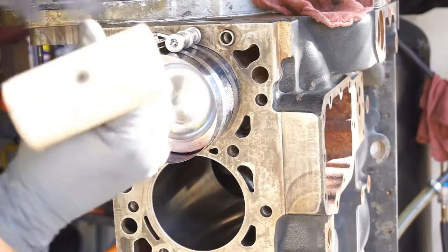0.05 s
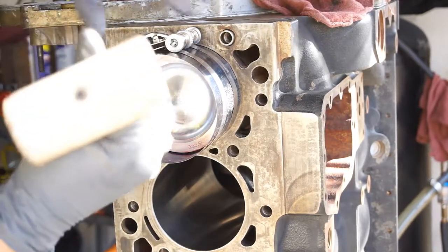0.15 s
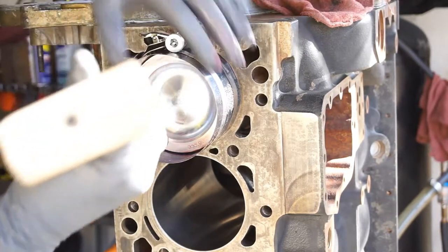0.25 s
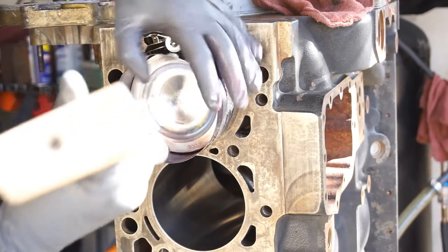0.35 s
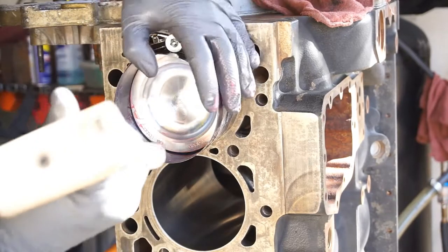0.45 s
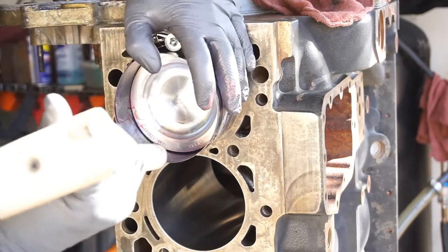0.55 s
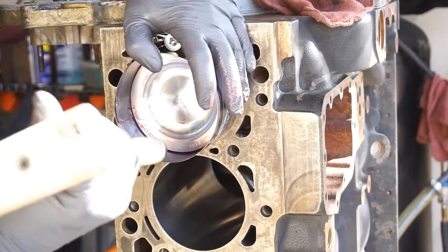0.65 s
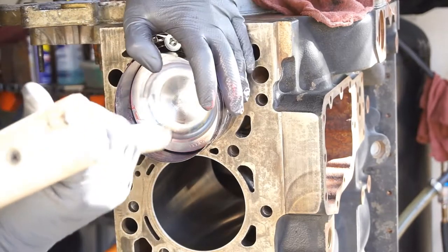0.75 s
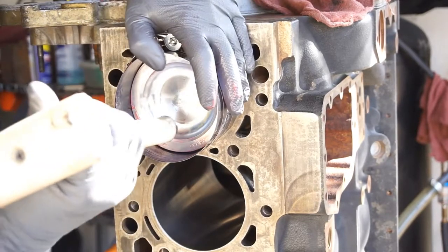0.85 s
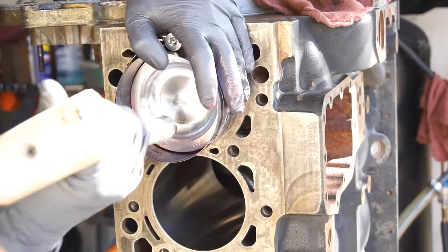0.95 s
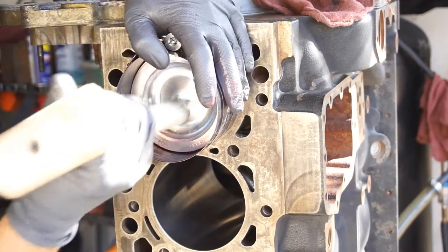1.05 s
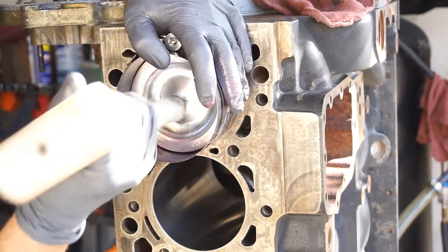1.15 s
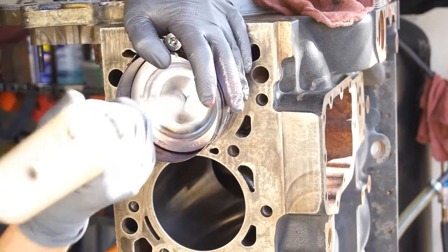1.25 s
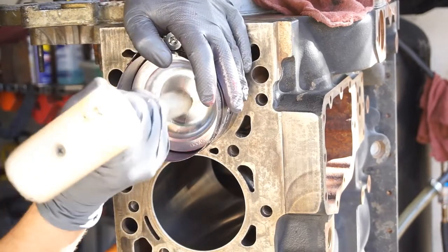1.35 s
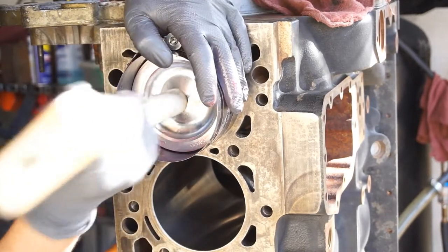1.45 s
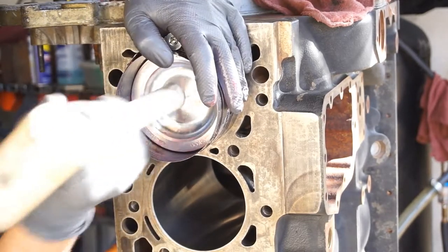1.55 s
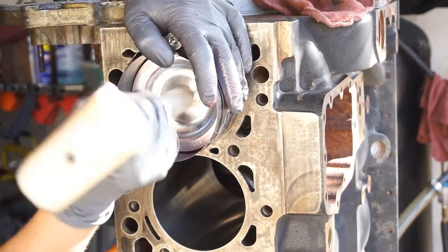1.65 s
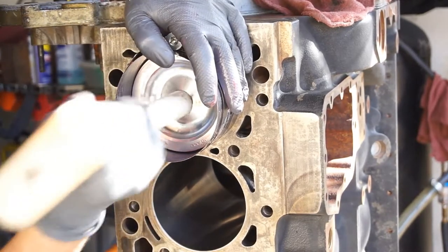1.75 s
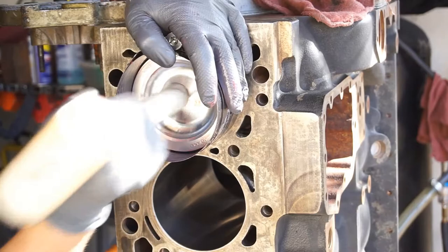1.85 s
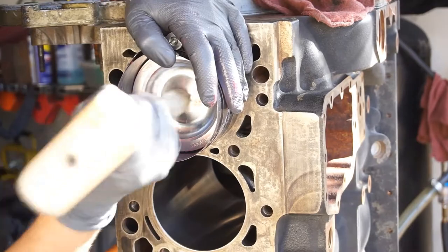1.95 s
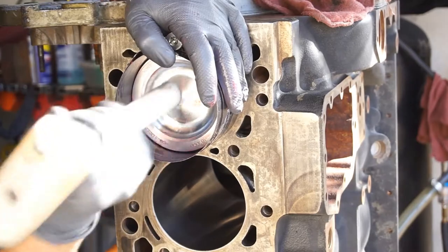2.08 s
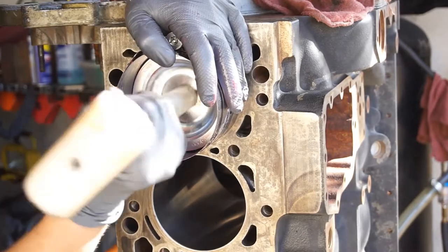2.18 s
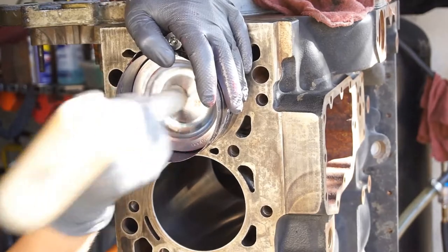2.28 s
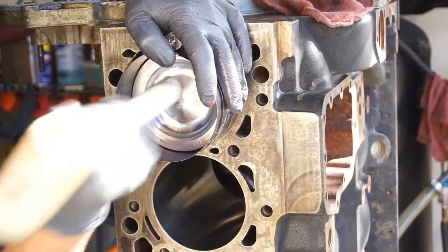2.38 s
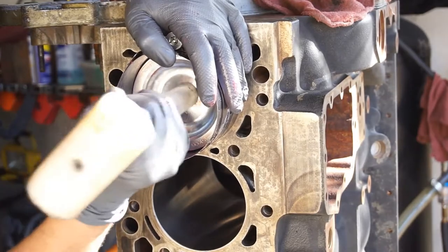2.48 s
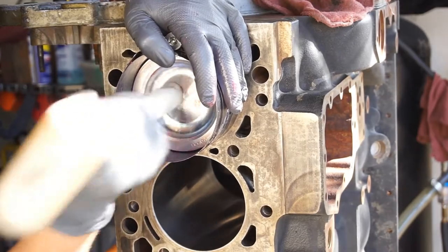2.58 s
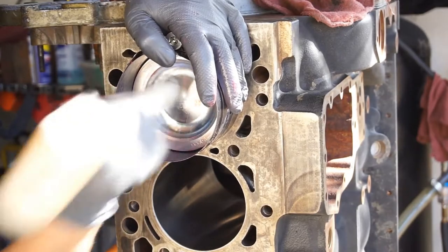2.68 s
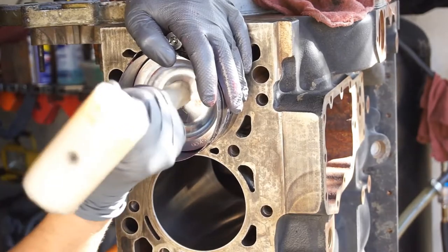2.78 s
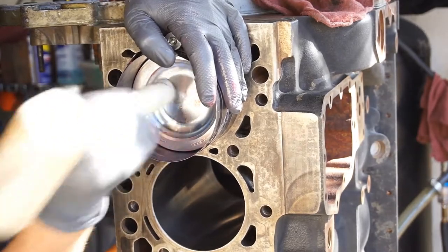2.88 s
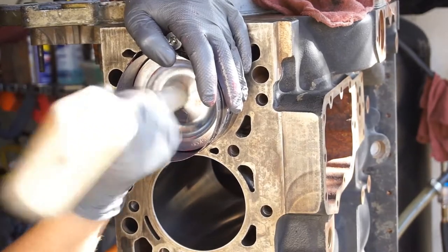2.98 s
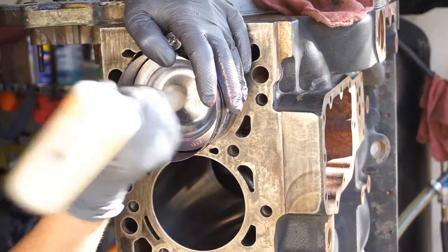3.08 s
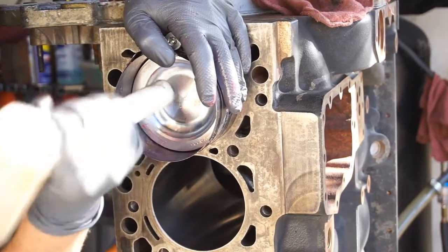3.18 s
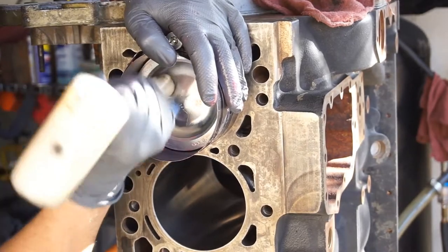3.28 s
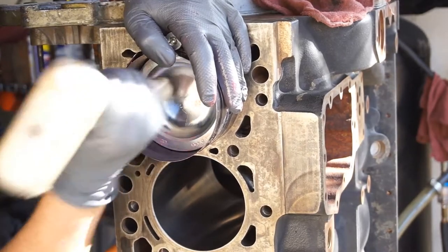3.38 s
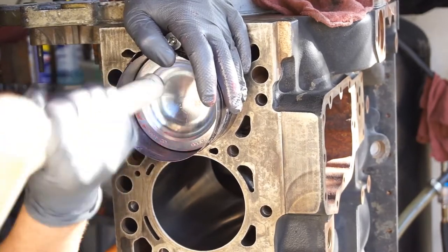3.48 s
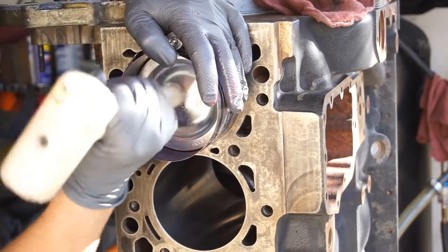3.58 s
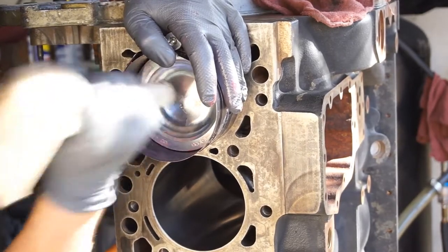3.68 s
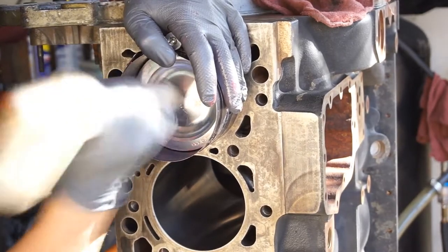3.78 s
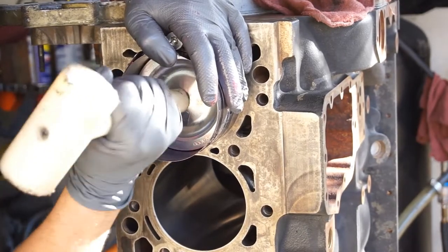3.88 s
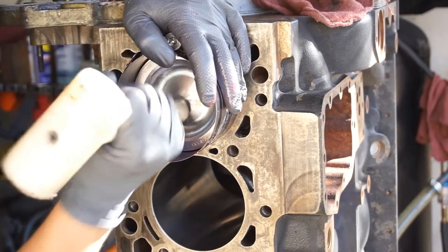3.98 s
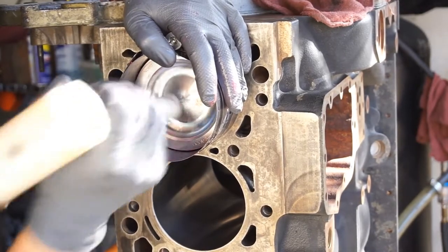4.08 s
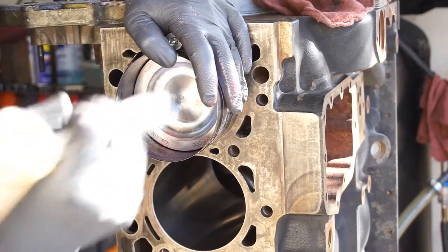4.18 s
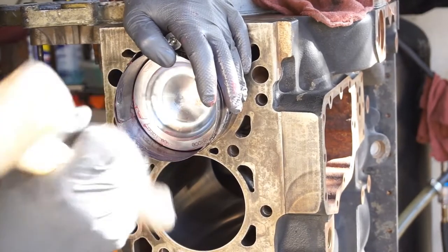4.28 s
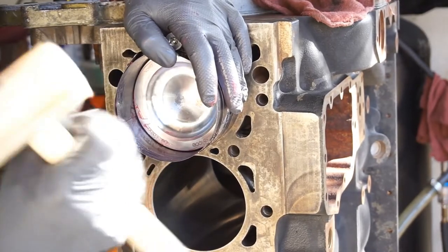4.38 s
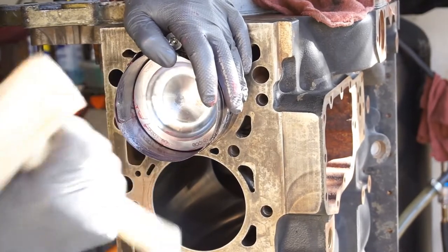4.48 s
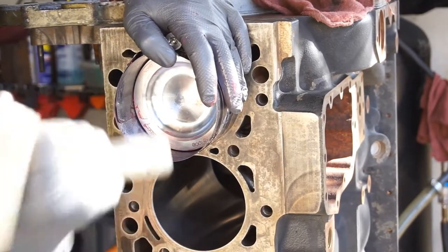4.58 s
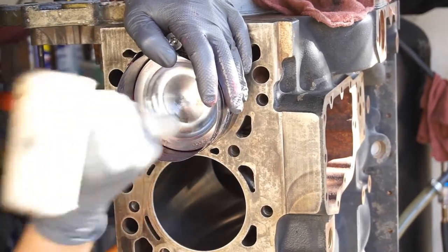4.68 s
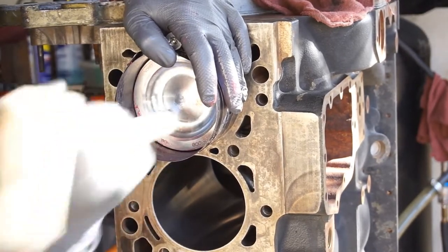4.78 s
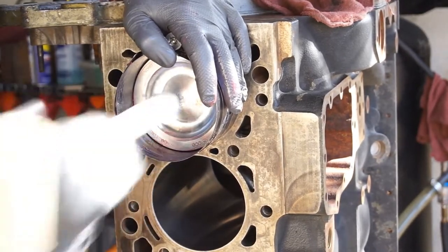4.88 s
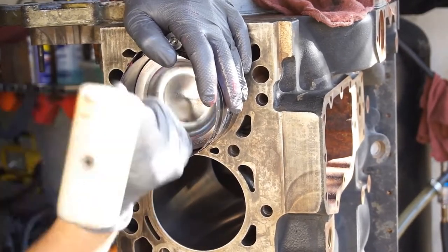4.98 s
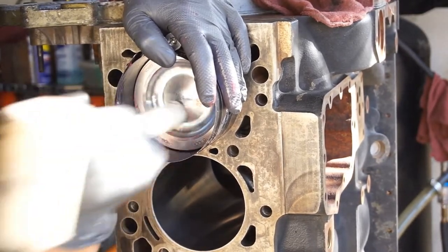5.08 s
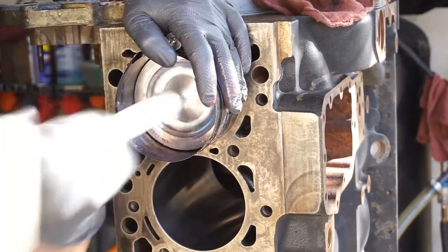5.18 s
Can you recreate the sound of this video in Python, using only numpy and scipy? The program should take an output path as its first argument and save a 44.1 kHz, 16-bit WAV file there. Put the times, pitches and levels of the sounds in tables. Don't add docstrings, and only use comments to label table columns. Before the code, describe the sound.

A wooden handle end knocks a metal piston into its cylinder in quick, even, hard taps ringing through a hard-walled workshop.

```python
import sys
import numpy as np
from scipy import signal
from scipy.fft import rfft, irfft, next_fast_len
from scipy.io import wavfile
from scipy.ndimage import uniform_filter1d, map_coordinates

SR = 44100
rng = np.random.default_rng(int(sys.argv[2]) if len(sys.argv) > 2 else 0)


def ratio_of_db(decibels):
    return 10 ** (np.asarray(decibels, float) / 20)


def put_to_file(sound):
    columns = np.atleast_2d(sound).T
    safe = np.clip(columns, -1, 1)
    whole_steps = np.round(safe * 32767)
    wavfile.write(sys.argv[1], SR, whole_steps.astype(np.int16))


N = 231348


def unit(x):
    return x / np.sqrt(np.mean(x ** 2) + 1e-20)


def along(points, hz):
    f, v = np.transpose(points)
    return np.interp(np.log(hz + 1), np.log(f + 1), v)


def curves(rows, rest):
    s, *cols = np.transpose(rows)
    return [np.interp(np.arange(N) / SR, s, c, rest, rest) for c in cols]


def filtered(x, response):
    m = next_fast_len(x.shape[-1] + 8192)
    return irfft(rfft(x, m) * response(np.fft.rfftfreq(m, 1 / SR)), m)[..., :x.shape[-1]]


def paired(pair, spectrum, alike):
    def mid_side_gains(hz):
        turn = np.arccos(np.clip(along(alike, hz), -1, 1)) / 2
        return ratio_of_db(along(spectrum, hz)) * [np.cos(turn), np.sin(turn)]

    mid, side = filtered(pair, mid_side_gains)
    return np.array([mid + side, mid - side])


def lumpy(spectrum, rate, lump_db):
    # (frequency [Hz], likeness [-1..1])
    loose = [(60, 0.37), (220, 0.55), (840, 0.2), (3150, 0.079), (11800, -0.13)]
    steps = rng.standard_normal(int(N * rate / SR) + 4)
    stutter = map_coordinates(steps, [np.arange(N) * rate / SR])
    noise = paired(rng.standard_normal((2, N)), spectrum, loose)
    return unit(ratio_of_db(lump_db * stutter) * noise)


def swell(s, hold_s, db, rise_s, fall_s):
    t = np.arange(N) / SR - s
    return ratio_of_db(db + 60 * np.minimum(0, np.minimum(t / rise_s, (hold_s - t) / fall_s)))


def add(out, s, x):
    part = out[:, round(s * SR):][:, :x.shape[-1]]
    part += x[..., :part.shape[1]]


def room_air():
    # (frequency [Hz], density [dB per Hz])
    air_spectrum = [(15, -74), (25, -32), (221, -14.5), (265, -13.5), (466, -8), (739, -5.5), (1140, -8.5),
                    (1860, -11), (2340, -16), (10600, -19.5), (11500, -2.5), (15000, -52), (22000, -120)]
    air_db = -59
    return ratio_of_db(air_db - 3.0) * lumpy(air_spectrum, 8, lump_db=.4)


def steel_band():
    # (start [s], hold [s], level [dB])
    singing = [
        (4.29, 0.56, -74),
        (4.41, 0.092, -72),
        (4.57, 0.046, -68),
        (4.709, .03, -63),
        (4.787, 0.036, -81),
        (4.85, 0.069, -60),
        (5.034, 0.053, -55),
        (5.143, 0.042, -61),
    ]
    # (time [s], pitch [Hz], level [dB])
    squeak_path = [
        (1.08, 7600, -74),
        (1.11, 8700, -73),
        (1.135, 9800, -70),
        (1.15, 10300, -73),
    ]
    drift = np.cumsum(rng.standard_normal(N)) * 0.0322
    level = sum(swell(*row, rise_s=0.066, fall_s=0.062) for row in singing)
    hum = level * np.sin(2 * np.pi * 2040 * np.arange(N) / SR + drift)
    squeak_hz, squeak_db = curves(squeak_path, rest=-99)
    squeak = ratio_of_db(squeak_db) * np.sin(2 * np.pi * np.cumsum(squeak_hz) / SR + 6 * drift)
    return (hum + squeak) * ratio_of_db([[1.1], [-1.1]])


def glove_ticks():
    # (time [s], peak [dB], pitch [Hz], t60 [s], left over right [dB])
    tick_rows = [(0.228, -48, 710, 0.047, 1.5), (0.315, -48, 1570, 0.036, 9), (.459, -35, 1800, 0.14, 4),
                 (.46, -33.5, 4300, 0.063, -2), (0.785, -36.5, 9000, 0.0079, 10),
                 (1.035, -40.5, 9500, 0.0054, 14), (1.137, -43.5, 5050, 0.061, 6),
                 (4.067, -60, 4500, 0.01, 5), (4.102, -56, 3660, 0.027, 7), (4.3, -42.5, 8800, 0.051, 14),
                 (4.334, -42.5, 4180, 0.021, 10), (4.336, -35.5, 9200, 0.022, 14),
                 (4.389, -61, 6000, 0.018, 4.5), (4.4582, -28.5, 4030, 0.004, 13),
                 (4.4597, -39, 2560, 0.011, -12), (4.735, -55, 9000, 0.0092, 13)]
    out, t = np.zeros((2, N)), np.arange(SR // 8) / SR
    for s, db, hz, t60, pan_db in tick_rows:
        decay = ratio_of_db(-60 * t / t60) + ratio_of_db(-35 - 60 * t / 0.26)
        rise = 1 - np.exp(-t / (.12 * t60))
        burst = rng.standard_normal(len(t)) * decay * rise
        burst = filtered(burst, lambda f: 1j * f * hz * 1.3 / (hz * hz - f * f + 1j * f * hz * 0.5))
        add(out, s, ratio_of_db(db - 0.1) * burst / np.abs(burst).max() * ratio_of_db([[pan_db / 2], [-pan_db / 2]]))
    return out


def hands():
    # (start [s], hold [s], shuffle [dB], rustle over shuffle [dB], rustle left over right [dB])
    moves = [(0, 0.12, -51.5, -5, 5.5), (0.158, 0.19, -54.5, -6, 3), (0.34, 0.046, -62, 2, 0.6),
             (0.407, 0.058, -50, 2, -.6), (0.508, 0.18, -60, -4, 1.1), (0.781, .006, -61, 1.5, -1),
             (0.836, 0.37, -61.5, -6, 1.1), (1.027, .03, -58.5, -11, 1.1), (1.14, 0.011, -60.5, 3.5, 6),
             (1.2, .07, -55.5, -9, 4), (3.938, 0.047, -60, -1.5, 5), (4.07, 0.04, -72.5, 0.5, 12),
             (4.322, 0.028, -81.5, 29.5, 5), (4.385, .008, -93, 16, 5), (4.423, 0.018, -84, 26, 10),
             (4.457, 0.014, -75, 14.5, -2), (4.504, 0.046, -70, -1, 6), (4.599, 0.018, -61.5, -0.5, 9),
             (4.67, 0.29, -67, -25, 3)]
    # (frequency [Hz], density [dB per Hz])
    shuffle_spectrum = [(59, -55), (100, -27), (188, -22.5), (269, -6.5), (618, -2.5), (1660, -4.5),
                        (1850, -4.5), (4000, -18), (5200, -32), (8800, -120)]
    # (frequency [Hz], density [dB per Hz])
    rustle_spectrum = [(1180, -64), (2000, -6.5), (3100, -4.5), (4070, -2), (6590, -5), (10600, -1.5),
                       (11300, 4.5), (11500, -17), (15000, -56), (22000, -120)]
    # (time [s], level [dB])
    slide_level = [
        (.84, -77),
        (.9, -58.5),
        (.97, -56.5),
        (1.05, -60.5),
        (1.12, -67),
        (1.2, -84),
    ]
    power = 0
    for s, hold_s, db, over_db, pan_db in moves:
        split = ratio_of_db([[0], [2 * over_db + pan_db], [2 * over_db - pan_db]])
        power = power + swell(s, hold_s, db, rise_s=0.2, fall_s=0.31) ** 2 * split
    shuffle = ratio_of_db(-1.5) * np.sqrt(power[0]) * lumpy(shuffle_spectrum, 40, lump_db=2.0)
    rustle = ratio_of_db(1.55) * np.sqrt(power[1:]) * lumpy(rustle_spectrum, 200, lump_db=1.5)
    slide_spectrum = [(900, -63.5), (1200, -4), (1440, 9), (1650, -20), (2200, -59)]
    slide = ratio_of_db(curves(slide_level, rest=-99)[0]) * lumpy(slide_spectrum, 90, lump_db=1.5)
    return shuffle + rustle + slide


def wash(lasting, floor_ms, bright_db, ring_hz, ring_db, skirt_hz, skirt_db, top_hz):
    # (frequency [Hz], density [dB per Hz])
    tail_spectrum = [(71, -64), (120, -23), (252, 10), (382, -0.5), (508, 6), (602, 6), (816, 3), (1150, 4),
                     (1480, 3.5), (1720, -3.5), (2150, 6.5), (3100, -3), (4860, -5), (11200, -20.5),
                     (14600, -77), (22000, -120)]
    # (frequency [Hz], t60 [s])
    room_decay = [(200, 0.72), (600, 0.5), (2000, 0.43), (5000, 0.35), (10000, 0.35)]
    # (frequency [Hz], share [0..1])
    same_share = [(300, .9), (700, .7), (1000, .5), (2000, .35), (8000, .25)]
    # (frequency [Hz], left-right likeness [-1..1])
    tail_likeness = [(60, 0.27), (170, 1), (500, 0.9), (1430, 0.51), (4100, 0.16), (11800, -0.79)]
    modal_hz, build_s = 420., .004

    hz, t, z = signal.stft(np.array([lasting, rng.standard_normal(lasting.shape)]), SR, nperseg=256)
    same = np.clip(along(same_share, hz), 0, 1)[:, None]
    patches = uniform_filter1d(rng.standard_normal(z.shape[2:]), size=3, axis=0)
    patches = unit(uniform_filter1d(patches, size=4, axis=1))
    mixed = np.sqrt(same) * z[0] + np.sqrt(1 - same) * z[1]
    mixed = mixed * ratio_of_db(1.2 * patches - 60 * t / along(room_decay, hz)[:, None])
    tail = unit(paired(signal.istft(mixed, SR, nperseg=256)[1], tail_spectrum, tail_likeness))

    def hump(f, centre_hz, width_hz):
        return np.exp(-((f - centre_hz) / width_hz) ** 2)

    def colour(f):
        landing_db = ring_db * hump(f, ring_hz, 84) + (skirt_db + 0.5) * hump(f, skirt_hz, 870)
        landing_db = landing_db + bright_db * along([(2500, 0.092), (7000, 0.33)], f)
        floor = 1 + 0.31 * np.exp(-2j * np.pi * f * floor_ms / 1000)
        return ratio_of_db(landing_db) * floor * (.33 + .67 * f ** 4 / (f ** 4 + modal_hz ** 4))

    tail = filtered(tail, colour)
    return tail * (1 - np.exp(-np.arange(tail.shape[1]) / SR / build_s)) * ratio_of_db([[.9], [-.9]])


def knock(lead, crown_hz, crack_db, ring_hz, ring_db, skirt_hz, skirt_db, top_hz):
    # (frequency [Hz], level [dB], t60 [s])
    piston = [(650, -5, .016), (950, -5, .014), (1380, -11, .016), (2480, -12, .012), (3300, -13, .01)]
    quick_s, crack_s = .006, .009
    grip_s, bloom_s, deck_ms = .0025, .0005, 1.5
    t = np.arange(SR // 16) / SR
    modes = piston + [(crown_hz, -7, .02), (skirt_hz, -11, quick_s), (top_hz, -17, quick_s)]
    ring = 0
    for hz, db, t60 in modes:
        ring = ring + ratio_of_db(db + rng.normal(0, 1) - 60 * t / t60) * np.cos(2 * np.pi * hz * t)
    choke = .12 + .88 / (1 + np.exp(8 * (t / grip_s - 1)))
    ring = ring * choke * (1 - .4 * np.exp(-t / bloom_s))
    ring = ring + ratio_of_db(ring_db - 13.0 - 60 * t / 0.013) * np.cos(2 * np.pi * ring_hz * t)
    crack = rng.standard_normal(len(t)) * ratio_of_db(crack_db + 11.5 - 60 * t / crack_s)
    crack = uniform_filter1d(crack, size=2)
    crack = crack + ratio_of_db(-1) * np.roll(crack, round(deck_ms * SR / 1000))
    rise = np.r_[-.45 * np.hanning(11), np.hanning(15)]
    whole = np.convolve(ring, rise / rise.sum())[:len(t)] + np.roll(crack, 12)
    whole = np.pad(whole, (lead, 0))
    whole = filtered(whole, lambda hz: hz ** 6 / (hz ** 6 + 244.0 ** 6))
    return whole / whole.max()


def taps():
    # (time [s], peak [dB], ring [Hz], ring level [dB], room boom over the peak [dB])
    blows = [(1.2615, -13.5, 2165, 9.5, -3), (1.5552, -11, 2040, 6, 0.4), (1.8182, -10.5, 2150, 5.5, 0.3),
             (2.0874, -8.7, 2080, 6.5, 0), (2.3655, -6.5, 2330, 5.5, -3.5), (2.6444, -6.5, 2114, 3.5, -2.5),
             (2.9244, -8, 2170, 7, -2.5), (3.1932, -7.5, 1990, 4.5, 1.6), (3.493, -10.5, 1950, 9, 0.3),
             (3.7327, -8.5, 2030, 7.5, -0.4), (4.8761, -10.5, 2050, 5.5, 4.5), (5.1798, -9.5, 1870, 3, 3)]
    # (from [s], crown mode [Hz], skirt mode [Hz], skirt level [dB], floor echo [dB])
    spots = [
        (1.2, 2350, 5160, -3, 2),
        (2.2, 2340, 5030, 4, -3.4),
        (3.4, 2360, 3580, 6, -10.5),
        (4.8, 1860, 4200, 3, -2.5),
    ]
    # (delay [ms], level [dB])
    walls = [(11.5, -17), (18, -12), (26, -18), (33.5, -13), (37, -14), (45, -17), (56, -18)]
    # (frequency [Hz], level [dB], t60 [s])
    standing = [(237, -11, .7), (253, -2, 1.1), (267, -3, .9), (298, -8, .8), (328, -11, .7), (369, -7, .7),
                (444, -9, .7), (471, -9, .8), (544, -9, .6), (581, -7, .6), (598, -11, .6), (616, -9, .6),
                (705, -11, .6), (751, -11, .6), (786, -12, .6), (864, -13, .6), (893, -12, .6),
                (939, -14, .5), (1020, -13, .5), (1050, -14, .5), (1133, -14, .5), (1163, -13, .5),
                (1305, -15, .5), (1367, -14, .5), (1478, -13, .5)]
    usual_db, crack_lag = -7, 0.6
    usual_crack_db, bright_ref_db = -20, -19
    lead = 400

    out, t = np.zeros((2, N)), np.arange(SR * 3 // 4) / SR
    lasting = rng.standard_normal((2, len(t)))
    start = rng.uniform(0, 2 * np.pi, len(standing))
    lean = rng.normal(0, 0.9, (len(walls), 1)) * [1, -1]
    tilt = rng.normal(0.26, 0.93, (len(standing), 1, 1)) * [[1], [-1]]
    hold = ratio_of_db(-15 / (1 + np.exp((.17 - t) / .01))) * (1 - np.exp(-t / .012))
    first = np.diff([0] + [row[0] for row in blows]) > .6
    for (s, db, ring_hz, ring_db, boom_db), after_pause in zip(blows, first):
        _, crown_hz, skirt_hz, skirt_db, floor_db = [spot for spot in spots if spot[0] < s][-1]
        scatter = 1 + .03 * rng.standard_normal(size=3)
        crown_hz, skirt_hz, top_hz = [crown_hz, skirt_hz, 7350] * scatter
        floor_ms = 6.7 + 1.4 * after_pause
        crack_db = usual_crack_db - crack_lag * (db - usual_db)
        tone = ring_hz, ring_db, skirt_hz, skirt_db, top_hz

        blow = ratio_of_db(db + 1.0) * knock(lead, crown_hz, crack_db, *tone)
        late = round(floor_ms * SR / 1000)
        both = blow + ratio_of_db(floor_db) * np.pad(blow, (late, 0))[:len(blow)]
        early = s - (lead + 17) / SR
        add(out, early, both * ratio_of_db([[1.2], [-1.2]]))

        dull = uniform_filter1d(blow, size=4)
        for (ms, wall_db), side_db in zip(walls, lean):
            add(out, early + ms / 1000, dull * ratio_of_db(wall_db + side_db[:, None] + rng.normal(0, 1.2)))

        boom = 0
        for (hz, level, t60), phase, side_db in zip(standing, start, tilt):
            gain = ratio_of_db(level + side_db + rng.normal(0, 3.2) - 60 * t / t60)
            boom = boom + gain * np.sin(2 * np.pi * hz * t + phase + rng.normal(0, 0.64))
        add(out, s, ratio_of_db(db + boom_db - 33) * unit(boom) * hold)

        tail = wash(lasting, floor_ms, crack_db - bright_ref_db, *tone)
        add(out, s, ratio_of_db(db + 2.38 - 31) * tail)

        rumble = rng.standard_normal((2, len(t))) + 2 * rng.standard_normal(len(t))
        thump = filtered(rumble, lambda hz: hz ** 2 / (40 + 1j * hz) ** 2 / (130 + 1j * hz) ** 2)
        add(out, s, ratio_of_db(db - 65 + 6.0) * unit(thump) * ratio_of_db(-60 * t / 0.68))
    return out


def scene():
    return room_air() + steel_band() + glove_ticks() + hands() + taps()


def roll_off(x):
    return signal.sosfilt(signal.butter(12, 12380, fs=SR, output="sos"), x)


def record(dry):
    # (frequency [Hz], gain [dB])
    edge = [(10950, 0), (11150, -34), (11600, -52), (13000, -80)]

    def port(hz):
        lag = np.exp(-1j * np.pi * hz / SR * np.array([[-1], [1]]))
        return ratio_of_db(along(edge, hz)) * lag

    x = filtered(dry, port)
    fall_db = 90 * np.arange(N) / SR
    peak_db = 20 * np.log10(np.abs(x).max(0) + 1e-9)
    held_db = np.maximum.accumulate(peak_db + fall_db) - fall_db
    duck_db = uniform_filter1d(0.25 * np.maximum(held_db + 20, 0), size=88)
    x = x * ratio_of_db(3.5 - duck_db)
    x = x / (1 + np.abs(x / .85) ** 3) ** (1 / 3)
    return roll_off(x)


dry = scene()
out = record(dry)
put_to_file(out)
```